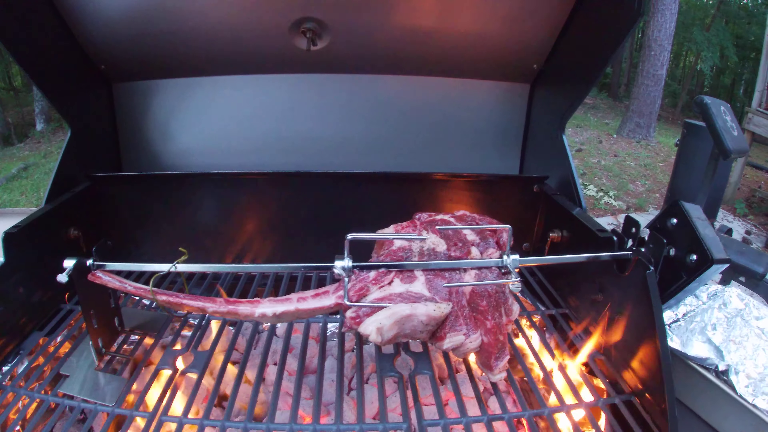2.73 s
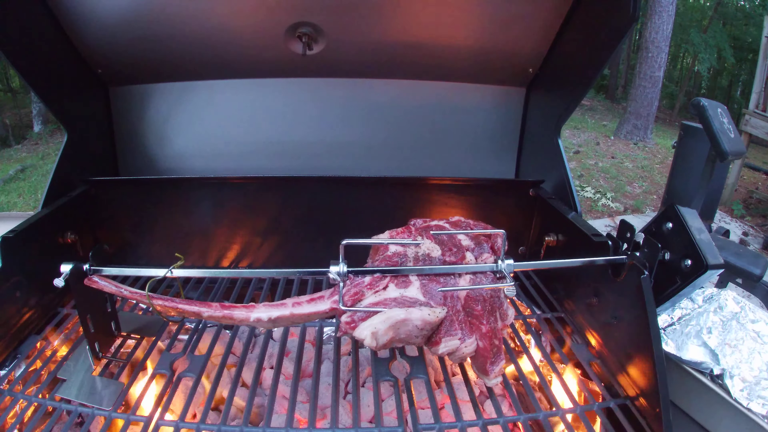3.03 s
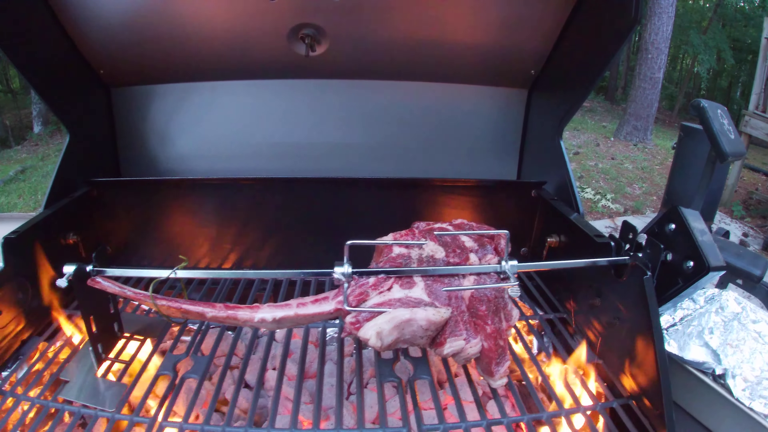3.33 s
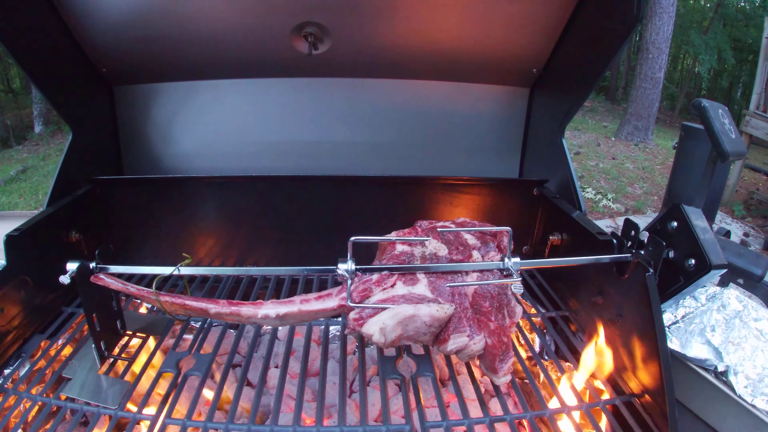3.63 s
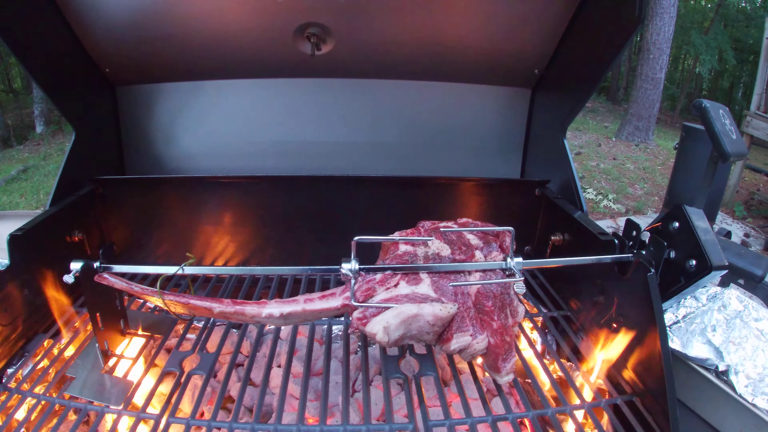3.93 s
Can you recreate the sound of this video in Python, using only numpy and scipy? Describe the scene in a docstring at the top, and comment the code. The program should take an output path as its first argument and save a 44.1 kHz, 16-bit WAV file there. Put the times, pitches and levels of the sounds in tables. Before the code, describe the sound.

A charcoal fire rumbles and crackles in a grill while birds sing nearby.

```python
"""Charcoal grill in a wooded yard

Flames rumble and flap in the firebox of an open grill, which hums now and then.
The coals hiss, pop and spit, and escaping steam whistles thinly. A songbird gives one falling
whistle and a quick trill, echoing among the trunks; another chirps far off."""
import sys
import numpy as np
from scipy import signal
from scipy.fft import rfft, irfft, next_fast_len
from scipy.io import wavfile
from scipy.ndimage import map_coordinates

SR = 44100
rng = np.random.default_rng(int(sys.argv[2]) if len(sys.argv) > 2 else 0)


def store_wav(level_fs):
    """Save 16-bit WAV to argv[1]."""
    pcm = np.round(np.clip(np.atleast_2d(level_fs), -1, 1) * 32767)
    wavfile.write(sys.argv[1], SR, pcm.T.astype(np.int16))


N = 176400  # 4 seconds

# the flames' rumble and the firebox's roar: pitch_hz, level_db
RUMBLE_COLOUR = [(10, -5), (20, 4.5), (50, 0), (65, -5.5), (110, -7), (135, -12.5), (205, -14.5),
                 (290, -27), (385, -21), (500, -35), (1000, -89)]
ROAR_COLOUR = [(80, -45), (115, -14.5), (135, 3), (165, 5.5), (210, -3), (270, -12.5), (340, -23.5),
               (600, -86)]
# how each swells and fades: time_s, level_db
RUMBLE_SWELL = [(0, -53.5), (.25, -58.5), (.7, -51.5), (1.1, -52), (1.35, -53), (1.9, -52), (2.3, -54.5),
                (2.7, -52.5), (3.2, -55), (4, -54.5)]
ROAR_SWELL = [(0, -61), (.2, -56.5), (.35, -62.5), (.55, -53.5), (.65, -53), (.95, -60), (1.6, -54),
              (2.2, -58.5), (2.55, -54.5), (2.7, -59), (3.1, -58.5), (3.4, -52.5), (3.7, -55.5), (4, -54.5)]
def flames(rumble_boost_db=2):
    """Flickering flames rumble, and the firebox answers with a low roar."""
    rumble = amp(curve(RUMBLE_SWELL) + rumble_boost_db + 1.5 * wobble(9.2)) * noise(RUMBLE_COLOUR)
    roar = amp(curve(ROAR_SWELL) + 4.65 * wobble(20)) * noise(ROAR_COLOUR)
    return rumble + roar


# flaps of flame: start_s, level_db
FLAPS = [(.099, -44.5), (0.274, -42.5), (.373, -36.5), (.416, -38), (0.453, -38.5), (.470, -43),
         (.514, -36.5), (0.83, -41), (1.191, -46), (1.275, -38), (1.376, -42.5), (2.34, -42), (2.511, -30),
         (2.8, -38), (2.825, -41), (2.843, -41), (3.211, -43.5), (3.35, -38.5), (3.449, -38.5),
         (3.727, -43)]
# the notes the firebox rings with: pitch_hz, level_db, fade_s (time to drop 60 dB)
FIREBOX_NOTES = [(148, -6.5, 0.057), (187.8, 3, 0.067), (263, -5.5, 0.023), (388, -17.5, 0.041),
                 (667, -15, 0.039)]
def flame_flaps(rise_s=.003):
    """Each flap of flame makes the firebox ring, slightly out of tune every time."""
    out = np.zeros(N)
    t = np.arange(SR // 4) / SR
    for start_s, flap_db in FLAPS:
        ring = np.zeros(len(t))
        for pitch_hz, level_db, fade_s in FIREBOX_NOTES:
            detuned_hz = pitch_hz * (1 + .03 * rng.normal())
            ring += amp(level_db - 60 * t / fade_s) * np.sin(2 * np.pi * detuned_hz * t)
        add(out, start_s, amp(flap_db) * ring * (1 - np.exp(-(t / rise_s) ** 2)))
    return out


# puffs of flame: middle_s, level_db, pitch_hz
PUFFS = [(2.48, -37, 30), (2.581, -35.5, 43), (2.779, -43, 22)]
def flame_puffs(width_s=.012):
    """Each puff is one deep, soft push and pull of air."""
    out = np.zeros(N)
    for middle_s, level_db, pitch_hz in PUFFS:
        t = np.arange(N) / SR - middle_s
        out += amp(level_db) * np.exp(-.5 * (t / width_s) ** 2) * np.sin(2 * np.pi * pitch_hz * t)
    return out


# how the hum comes and goes: time_s, level_db
HUM_SWELL = [(0, -62.5), (.6, -61), (.8, -64), (1.1, -57.5), (1.25, -48), (1.43, -47), (1.56, -53),
             (1.85, -68), (2.03, -55), (2.25, -64.5), (2.55, -67), (2.8, -59), (4, -56.5)]
def firebox_hum(pitch_hz=130):
    """The firebox hums one low, wavering note."""
    phase = wavering_phase(pitch_hz, waver=.01204, per_s=11)
    return np.sqrt(2) * amp(curve(HUM_SWELL) + .97 * wobble(10)) * np.sin(phase)


# the hiss of the coals: pitch_hz, level_db
HISS_COLOUR = [(1500, -18.5), (2600, -6), (3500, 5.5), (4800, 2), (6100, 3), (7100, -8), (8400, 0.5),
               (9600, -7), (12000, -14.5), (14000, -20.5), (15500, -48)]
# how it swells and fades: time_s, level_db
HISS_SWELL = [(0, -63), (.3, -68), (.75, -65.5), (1.2, -62.5), (2.1, -65), (2.5, -62), (2.85, -64),
              (3.3, -65), (3.7, -65.5), (4, -65.5)]
# pops of coal and spits of fat: start_s, level_db, decay_s, brightness_db_per_octave, ring_hz
POPS = [(.093, -44.5, 0.0011, 9, 4170), (.260, -50, 0.002, -3.5, 3960), (.6171, -35, .001, -2, 1520),
        (0.6174, -29.5, 0.00096, -2, 3460), (0.6888, -47.5, 0.0012, -3, 5600),
        (1.096, -41.5, 0.00094, 0, 5070), (1.1509, -43, 0.00065, 2, 5900),
        (1.2433, -38.5, 0.00086, 0, 4680), (1.5033, -41, .0006, -0.5, 4700), (1.878, -45, .0006, 3, 3700),
        (1.889, -44, .001, 1, 3500), (2.0095, -48, .00065, 0, 3400), (2.0711, -45.5, 0.00095, 0.5, 3900),
        (2.207, -47, .0007, 0, 5600), (2.3222, -46.5, .0006, -0.5, 5200), (2.360, -49.5, .0011, 2, 5400),
        (2.377, -46, 0.0014, 1.5, 3870), (2.434, -51.5, 0.002, -4, 3320), (2.633, -49.5, .0008, -2, 3500),
        (2.6454, -47, .0007, 3, 5700), (2.826, -43, 0.00037, -4, 4080), (3.061, -49, .0007, 1, 3700),
        (3.251, -46.5, .0012, -1.5, 3800), (3.8716, -43.5, 0.00079, -3.5, 1550),
        (3.8737, -36.5, 0.00064, -1, 5600), (3.8956, -48.5, .001, -1, 3600)]
SPITS = [(.005, -61, 0.06, -3.5, 3980), (0.148, -56.5, .008, 11, 5000), (.156, -58.5, 0.008, 12, 6000),
         (0.166, -58.5, 0.016, -3, 3800)]
def coals(ticks_per_s=90):
    """Hot coals pop, fat spits, and many tiny random ticks sound over a hiss."""
    out = amp(curve(HISS_SWELL) + 1.2 * wobble(14)) * noise(HISS_COLOUR)
    for start_s, level_db, decay_s, brightness, ring_hz in POPS + SPITS:
        add(out, start_s, amp(level_db) * crack(decay_s, brightness, ring_hz))
    for when, strength, bright, pitch in rng.random((int(ticks_per_s * N / SR), 4)):
        level_db = -63 + 2.3 * min(-np.log(1 - strength), 3)  # most ticks are faint
        ring_hz = np.interp(pitch, [0, 1], [3400, 8080])
        tick = crack(decay_s=.0006, brightness=2 + 7 * (bright - .5), ring_hz=ring_hz)
        add(out, when * N / SR, amp(level_db) * tick)
    return out


# how a pop rings among the coals and grate: pitch_hz, level_db
GRILL_COLOUR = [(300, -21), (900, -18), (1300, -4), (1800, -5), (2200, -15), (2750, -16), (3450, -2.5),
                (4600, -1), (5100, -4), (5750, 0), (6700, -8.5), (7900, -7.5), (11200, -15), (13500, -25),
                (15000, -41)]
def crack(decay_s, brightness, ring_hz, rise_s=.0004, tail_s=.006, size=8192):
    """A coal splits: a dying burst of noise, coloured by the coal's own ring and by the grill."""
    t, hz = np.arange(size) / SR, np.fft.rfftfreq(size, 1 / SR)
    fade = np.exp(-t / decay_s) + amp(-17) * np.exp(-t / tail_s)
    burst = (1 - np.exp(-t / rise_s)) * fade * rng.standard_normal(size)
    ring_db = 6.5 * np.exp(-.5 * (np.log2((hz + 1) / ring_hz) / .13) ** 2)
    octaves_up = np.log2(np.maximum(hz, 1000) / 1000)
    colour_db = along(GRILL_COLOUR, hz) + brightness * octaves_up + ring_db
    # a filter that rings only after the burst, so the start stays sharp
    cepstrum = irfft(np.log(amp(colour_db)))
    colour = np.exp(rfft(2 * cepstrum[:size // 2], size) - cepstrum[0])
    pop = irfft(rfft(burst) * colour)
    return pop * np.sqrt(decay_s * SR) / np.linalg.norm(pop)


# steam whistles, one list of points each: time_s, pitch_hz, level_db
STEAM_WHISTLES = [
    [(1.32, 6600, -74), (1.37, 6900, -67), (1.45, 6900, -72)],
    [(2.26, 8240, -72), (2.29, 8840, -72), (2.32, 9080, -71), (2.35, 8450, -78)],
    [(2.585, 8990, -68), (2.605, 9700, -69), (2.63, 8500, -78), (2.645, 8300, -64), (2.66, 9070, -69)],
    [(2.77, 8200, -67.5), (2.795, 8500, -63), (2.83, 8800, -67), (2.89, 8950, -80)],
    [(2.93, 9040, -67), (2.95, 9130, -71), (2.975, 9250, -67), (2.99, 8600, -75), (3.03, 8200, -70),
     (3.09, 8270, -61), (3.13, 8300, -64), (3.15, 8050, -69)],
    [(3.29, 8200, -72), (3.38, 9560, -81), (3.44, 9200, -70), (3.49, 9660, -77)],
    [(3.5, 8690, -68), (3.53, 8540, -69.5), (3.64, 8190, -64.5), (3.75, 8260, -72.5), (3.83, 8330, -61),
     (3.92, 8130, -73), (3.99, 8450, -69)],
]
# short pips of steam: middle_s, pitch_hz, level_db
STEAM_PIPS = [(1.372, 8400, -66.5), (1.689, 8360, -61), (1.825, 8600, -66)]
def steam(half_pip_s=.0071, flutter_db=3):
    """Steam leaves the coals in thin, unsteady whistles and pips."""
    pips = [[(s - half_pip_s, hz, db - 4), (s, hz, db), (s + half_pip_s, hz, db - 17)]
            for s, hz, db in STEAM_PIPS]
    whistles = sum(whistle(points, waver=.006) for points in STEAM_WHISTLES + pips)
    return whistles * amp(flutter_db * wobble(60))


# the songbird's falling whistle: time_s, pitch_hz, level_db
BIRD_CALL = [(.828, 2840, -69), (.865, 2540, -60), (.915, 2340, -59.5), (.95, 2275, -62),
             (1.012, 2240, -68), (1.025, 2202, -54.5), (1.1, 2196, -53.3), (1.192, 2196, -53.8),
             (1.203, 2200, -64)]
def bird_call(fall_end_s=1.015):
    """A whistle slides down and holds; trunks echo it and leaves smear its raspy fall."""
    call = whistle(BIRD_CALL, waver=.003) * amp(1.3 * wobble(100))
    fall = whistle([point for point in BIRD_CALL if point[0] < fall_end_s], waver=.018)
    echo = amp(-9.5) * np.std(call) * unit(woods(call))
    return call + echo + amp(1) * leaves(fall, decay_s=.11)


# the high downward slide that opens the trill: time_s, pitch_hz, level_db
TRILL_SLIDE = [(1.385, 5600, -66), (1.405, 5050, -55), (1.435, 4650, -54), (1.465, 4350, -53.5),
               (1.5, 3900, -57)]
# the notes of the trill: start_s, level_db
TRILL_BEATS = [(1.508, -46), (1.576, -45), (1.643, -45), (1.71, -46), (1.775, -46), (1.84, -47),
               (1.903, -49.5), (1.97, -59)]
# one note's body and the upward flick that ends it: time_in_note_s, pitch_hz, level_db
TRILL_NOTE = [(0, 3050, -7), (.007, 3330, -2), (.014, 3510, 0), (.024, 3680, -2), (.03, 3850, -9)]
TRILL_FLICK = [(.026, 3850, -7), (.036, 4250, -6), (.05, 4700, -9)]
def bird_trill():
    """The songbird sings a raspy slide, then repeats one rising note fast among the trees."""
    notes, flicks = chirps(TRILL_NOTE, TRILL_BEATS), chirps(TRILL_FLICK, TRILL_BEATS)
    slide = leaves(whistle(TRILL_SLIDE, waver=.045), decay_s=.085)
    near = leaves(notes, decay_s=.015) + leaves(flicks, decay_s=.07)
    return slide + amp(-3) * near + amp(-2.5) * woods(notes + flicks)


# a second bird's chirps: start_s, level_db
FAR_BEATS = [(2.576, -58.5), (2.615, -62), (2.711, -65), (2.801, -68), (2.881, -62), (3.0, -59),
             (3.101, -63), (3.275, -62.5), (3.36, -67)]
# one chirp: time_in_note_s, pitch_hz, level_db
FAR_NOTE = [(0, 3860, 2), (.014, 4030, -9), (.03, 3880, -9)]
def far_bird():
    """Another bird chirps far off, blurred by leaves."""
    return leaves(chirps(FAR_NOTE, FAR_BEATS), decay_s=.03)


# how long the woods echo: pitch_hz, fade_s (time to drop 60 dB)
ECHO_FADES = [(1000, 1.3), (2200, 1.87), (4000, 0.77), (8000, 0.83)]
def woods(sound):
    """Sound bounces off many trunks and returns as a soft echo."""
    hz, t, bands = signal.stft(rng.standard_normal(SR * 3 // 2), SR, nperseg=256)
    fade = amp(-60 * t / along(ECHO_FADES, hz)[:, None])
    tail = signal.istft(bands * fade, SR, nperseg=256)[1]
    return signal.fftconvolve(sound, tail / np.linalg.norm(tail))[:N]


def leaves(sound, decay_s):
    """Leaves and near trunks smear a sound briefly; its level stays the same."""
    t = np.arange(SR // 4) / SR
    tail = rng.standard_normal(len(t)) * np.exp(-t / decay_s)
    return unit(signal.fftconvolve(sound, tail)[:N]) * np.std(sound)


# how a distant tone comes and goes: time_s, level_db
TONE_SWELL = [(0, -110), (1.5, -100), (1.62, -69), (1.8, -71.5), (1.95, -73), (2.2, -104), (4, -110)]
# its overtones: pitch_multiple, level_db
TONE_OVERTONES = [(2, -1.5), (3, 1), (4, -6.5)]
def distant_tone(base_hz=445.4):
    """A faint tone sounds once, made only of the overtones of its base pitch."""
    phase = wavering_phase(base_hz, waver=.00993, per_s=40)
    tone = sum(amp(level_db) * np.sin(multiple * phase) for multiple, level_db in TONE_OVERTONES)
    return amp(curve(TONE_SWELL)) * tone


# the lower and higher hush of the yard: pitch_hz, level_db
LOW_AIR_COLOUR = [(180, -38), (300, -7), (350, -2.5), (560, -8), (811, -2.5), (962, -8.5), (1410, -10),
                  (1530, -11), (1950, -13), (2600, -31.5), (3400, -75)]
HIGH_AIR_COLOUR = [(1300, -34), (2000, -2), (2800, 0), (3300, -27)]
# how the higher hush swells and fades: time_s, level_db
HIGH_AIR_SWELL = [(0, -74.5), (.7, -79), (1.35, -75), (1.6, -74), (1.9, -72.5), (2.15, -83.5), (2.9, -74.5),
                  (3.45, -88), (4, -78)]
def outdoor_air():
    """A soft hush lies behind everything."""
    low = amp(-65 + .54 * wobble(6.07)) * noise(LOW_AIR_COLOUR)
    return low + amp(curve(HIGH_AIR_SWELL)) * noise(HIGH_AIR_COLOUR)


def chirps(note, beats):
    """Repeat one raspy note at each (start_s, level_db)."""
    return sum(whistle(np.add(note, [start_s, 0, level_db]), waver=.04) for start_s, level_db in beats)


def whistle(points, waver, edge_s=.0017):
    """A tone with soft ends that follows (time_s, pitch_hz, level_db) points."""
    s, hz, db = np.transpose(points)
    t = np.arange(N) / SR
    fade_in = np.clip((t - s[0]) / edge_s + 1, 0, 1)
    fade_out = np.clip((s[-1] - t) / edge_s + 1, 0, 1)
    phase = wavering_phase(np.interp(t, s, hz), waver, per_s=300)
    return np.sqrt(2) * fade_in * fade_out * amp(np.interp(t, s, db)) * np.sin(phase)


def wavering_phase(pitch_hz, waver, per_s):
    """The angle of a sine wave whose pitch strays by about the fraction waver."""
    return 2 * np.pi * np.cumsum(pitch_hz * (1 + waver * wobble(per_s))) / SR


def wobble(per_s):
    """A smooth curve through per_s random values a second."""
    return map_coordinates(rng.standard_normal(int(N * per_s / SR) + 4), [np.arange(N) * per_s / SR])


def noise(colour):
    """Noise of average (rms) size 1; colour says how strong each pitch is."""
    gains = amp(along(colour, np.fft.rfftfreq(N, 1 / SR)))
    return unit(irfft(rfft(rng.standard_normal(N)) * gains, N))


def curve(points):
    """Join (time_s, value) points, one value a sample."""
    return np.interp(np.arange(N) / SR, *np.transpose(points))


def along(points, hz):
    """Read between (pitch_hz, value) points, with octaves evenly spaced."""
    pitches, values = np.transpose(points)
    return np.interp(np.log(hz + 1), np.log(pitches + 1), values)


def amp(db):
    """Turn decibels into a multiplier."""
    return 10 ** (np.asarray(db) / 20)


def unit(sound):
    """Scale to an average (rms) size of 1."""
    return sound / np.sqrt(np.mean(sound ** 2) + 1e-20)


def add(track, start_s, sound):
    """Mix a sound into the track at start_s."""
    i = max(0, round(start_s * SR))
    track[i:i + len(sound)] += sound[:max(0, N - i)]


def scene():
    """Grill, birds and background, the same in both channels."""
    grill = coals() + flames() + flame_flaps() + flame_puffs() + firebox_hum() + steam()
    birds = bird_call() + bird_trill() + far_bird()
    mono = grill + birds + distant_tone() + outdoor_air()
    return np.array([mono, mono])


def record(dry):
    """Cut away the very highest treble."""
    size = next_fast_len(N + SR // 4)
    kept = np.fft.rfftfreq(size, 1 / SR) < 15400  # Hz
    return irfft(rfft(dry, size) * kept, size)[:, :N]


dry = scene()
out = record(dry)
store_wav(out)
```